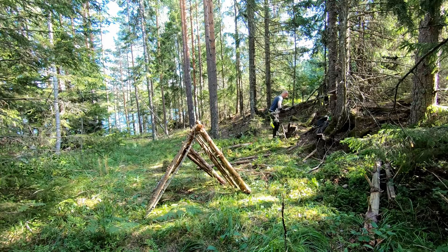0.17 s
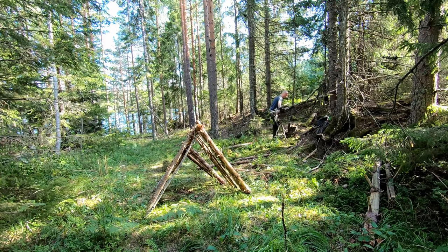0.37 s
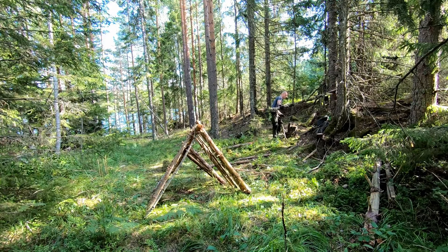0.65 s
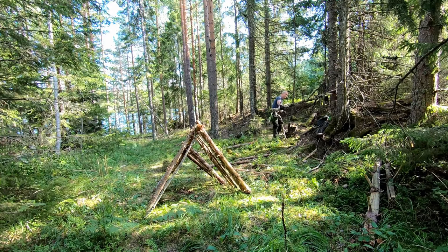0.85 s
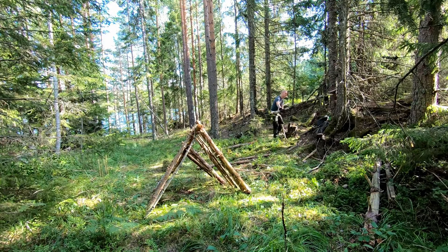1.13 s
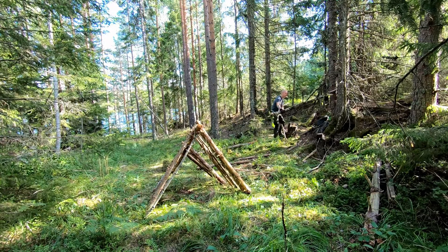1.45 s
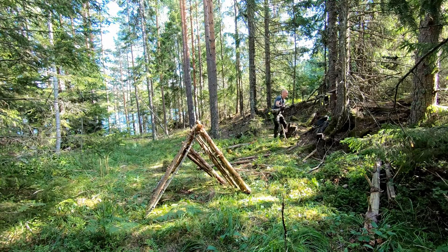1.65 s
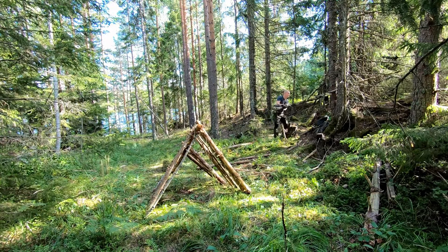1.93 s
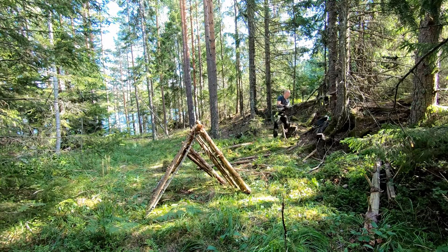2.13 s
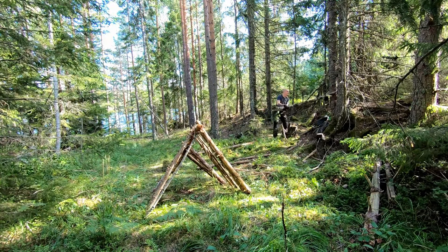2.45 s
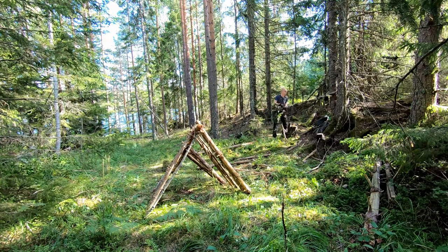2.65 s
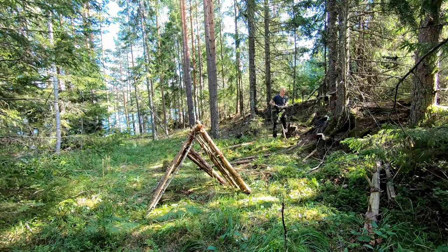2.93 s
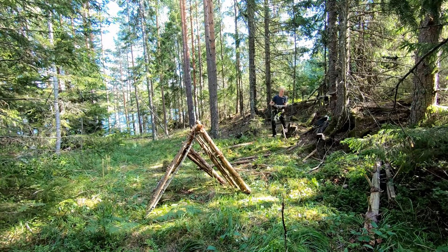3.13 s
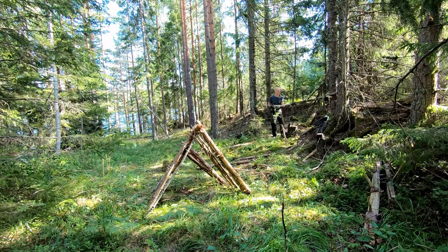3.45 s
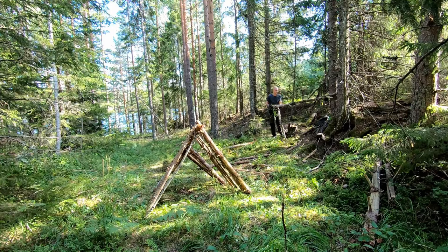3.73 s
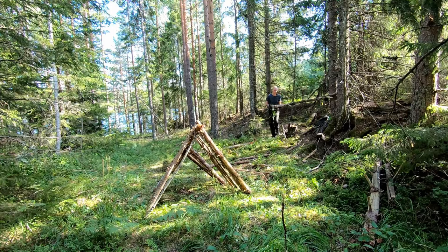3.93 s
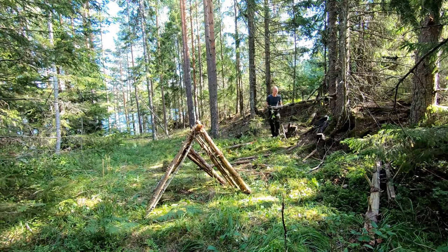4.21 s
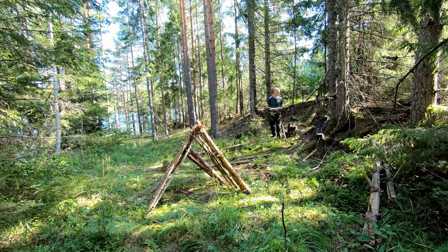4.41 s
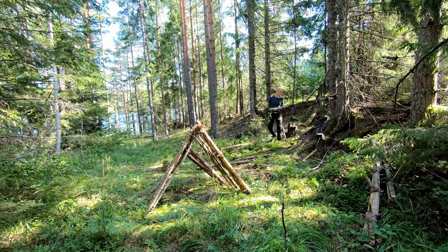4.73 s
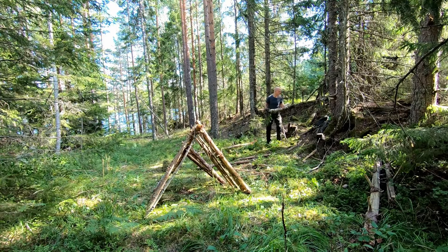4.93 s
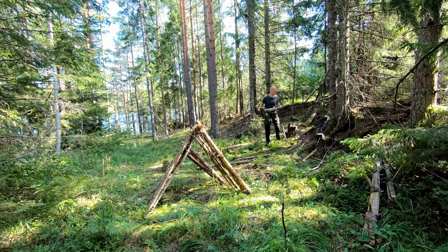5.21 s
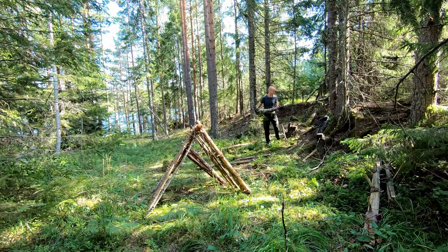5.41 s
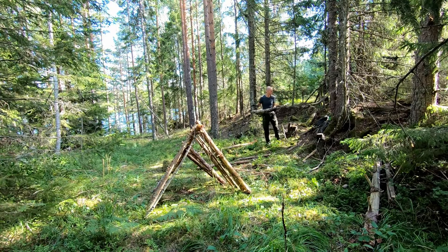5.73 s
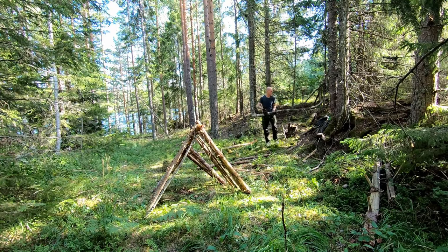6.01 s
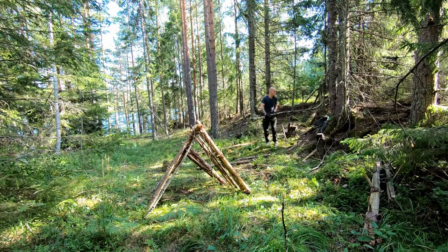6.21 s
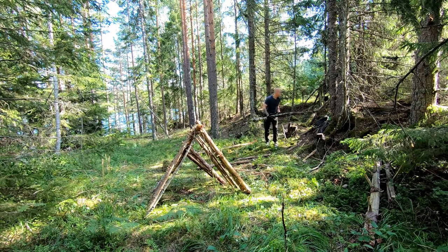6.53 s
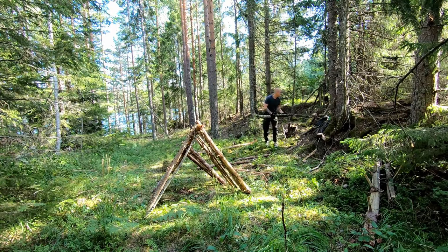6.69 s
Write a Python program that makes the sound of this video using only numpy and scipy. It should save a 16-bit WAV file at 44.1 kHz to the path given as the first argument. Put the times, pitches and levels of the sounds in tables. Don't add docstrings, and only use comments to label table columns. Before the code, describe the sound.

Quiet forest with a soft airy hush. A small bird buzzes nearby, then a dead branch snaps some way off, and a thicker one splinters in a louder run of cracks. Another stick cracks to the left, a far bird trills thinly, carried sticks clack dully amid rustling needles, and a bunch of thin twigs crunches at the end. Close stereo camera microphones catch a short woody echo from the trunks.

```python
import sys
import numpy as np
from scipy import signal
from scipy.fft import rfft, irfft, next_fast_len
from scipy.io import wavfile
from scipy.ndimage import uniform_filter1d

SR = 44100
rng = np.random.default_rng(int(sys.argv[2]) if len(sys.argv) > 2 else 0)


def decibels_to_gain(level_db):
    exponent = np.asarray(level_db, float) / 20
    return 10 ** exponent


def unload_wav(signal):
    wavfile.write(
        sys.argv[1],
        SR,
        np.round(np.clip(np.atleast_2d(signal).T, -1, 1) * 32767).astype(np.int16),
    )


N = 302349

# f/Hz, left minus right level/dB, left lead/rad
PORTS_AHEAD = [(100, 0, 0), (300, -2.5, -.25), (700, -6, .1), (1100, -6.5, .45), (2000, -4, .55),
               (3000, -2, .25), (4500, .5, .2), (6000, 1.5, -1.1), (8000, 3.5, -2.1), (9200, -1, -2.3),
               (10200, 4, -2.3), (13000, 1, -1.9)]


def evened(x):
    return x / np.sqrt(np.mean(abs(x) ** 2) + 1e-20)


def peaked(x, size):
    return x / np.sqrt(uniform_filter1d(x ** 2, size=size).max())


def read(points, hz, axis=1):
    table = np.transpose(points)
    return np.interp(np.log(hz + 1), np.log(table[0] + 1), table[axis])


def add(mix, s, sound):
    part = mix[round(s * SR):][:len(sound)]
    part += sound[:len(part)]


def band(x, lo_hz, hi_hz):
    return signal.sosfilt(signal.butter(2, [lo_hz, hi_hz], "bandpass", fs=SR, output="sos"), x)


def ports(left, ports_table, same=None, other=None):
    size = next_fast_len(N)
    hz = np.fft.rfftfreq(size, 1 / SR)
    a = b = rfft(left, size)
    if same:
        like = np.clip(read(same, hz), 0, 1)
        b = like * a + np.sqrt(1 - like ** 2) * rfft(other, size)
    gap = decibels_to_gain(read(ports_table, hz) / 2) * np.exp(.5j * read(ports_table, hz, axis=2))
    return irfft(np.array([a * gap, b / gap]), size)[:, :N]


def coloured(x, points):
    hz = abs(np.fft.fftfreq(4096, 1 / SR))
    log_gain = np.log(decibels_to_gain(np.maximum(read(points, hz), -100)))
    taps = np.fft.ifft(np.exp(np.conj(signal.hilbert(log_gain)))).real[:2048]
    return signal.oaconvolve(x, taps.reshape((1,) * (x.ndim - 1) + (-1,)), axes=-1)[..., :N]


def hush():
    # f/Hz, level/dB per Hz
    air_colour = [(15, -37), (25, 5.5), (92, -34), (153, -6), (394, -6), (463, -2), (531, -6.5), (734, 0.5),
                  (911, -4), (1160, -3.5), (3160, -9), (5140, -18.5), (7920, -15), (9320, -36),
                  (16000, -77.5)]
    # f/Hz, likeness/1
    air_same = [(60, -0.24), (150, 0.45), (380, 0.33), (950, 0.092), (2380, 0.64), (5980, 0.73),
                (15000, -0.16)]
    frames, hz = N // 256 + 5, np.fft.rfftfreq(1024, 1 / SR)
    re, im, patches = rng.standard_normal((3, frames, 513, 2)).transpose(0, 3, 2, 1)
    patches = uniform_filter1d(patches[0], size=12, axis=0)
    patches = evened(uniform_filter1d(patches, size=14, axis=1))
    z = (re + 1j * im) * decibels_to_gain(read(air_colour, hz)[:, None] + 1.4 * patches)
    air = signal.istft(z, nperseg=1024, noverlap=768)[1][:, :N]
    all_round = np.multiply(PORTS_AHEAD, [1, .4, 1])
    return decibels_to_gain(-60) * evened(ports(air[0], all_round, air_same, air[1]))


def steps():
    # t/s, peak level/dB, left minus right level/dB
    footfalls = [(0.769, -61, -1.0), (1.879, -58, -3), (3.489, -74, 2.0), (4.109, -57, 12), (4.809, -59, 6),
                 (5.009, -68, 6.0), (5.589, -67, 7.0), (5.749, -64, -6.0), (6.128, -45.5, 2),
                 (6.619, -69, -3.0), (6.829, -63, 2)]
    out = np.zeros((2, N))
    t = np.arange(-2000, 3000) / SR
    for s, db, pan_db in footfalls:
        for side, port in zip((1, -1), out):
            push = np.cos(2 * np.pi * 35 * t + 0.54 * side) * np.exp(-(t / 0.019) ** 2)
            add(port, s - 2000 / SR, decibels_to_gain(db + side * pan_db / 2) * push)
    return out


def note(hz, db, taper):
    tone = np.sin(2 * np.pi * np.cumsum(hz) / SR)
    return decibels_to_gain(db) * np.sqrt(2) * tone * signal.windows.tukey(len(hz), min(taper, 1))


def far_bird():
    # t/s, length/s, centre f/Hz, level/dB
    trills = [
        (3.3, .05, 8000, -75),
        (3.412, .075, 8250, -73),
        (3.575, .09, 8050, -77),
        (3.72, .11, 8080, -75),
        (3.872, .165, 7970, -68),
        (4.072, .185, 7900, -68),
        (4.291, .19, 7870, -68),
        (4.527, .17, 7880, -68),
        (4.74, .07, 7950, -78),
    ]
    out = np.zeros(N)
    for s, length, hz, db in trills:
        swing = np.cos(2 * np.pi * 33.5 * np.arange(round(length * SR)) / SR)
        pitch = hz - 40 + 420 * swing + 135 * swing ** 2
        add(out, s, note(pitch, db, .2) * (1 - .45 * swing))
    return out


def near_bird():
    # t/s, length/s, start f/Hz, end f/Hz, level/dB
    whistles = [
        (.378, .062, 6880, 6800, -70),
        (.445, .04, 6750, 6600, -76),
        (1.538, .022, 5000, 5900, -70),
        (1.665, .03, 4900, 6000, -68),
        (2.965, .038, 7050, 5250, -61),
        (3.1, .022, 6100, 6900, -60),
        (3.144, .055, 6650, 4950, -63),
        (3.252, .068, 6450, 4950, -63),
        (3.385, .07, 5900, 4600, -64),
        (3.457, .022, 4950, 5550, -70),
    ]
    # t/s, length/s, held f/Hz, end f/Hz, level/dB
    buzzes = [
        (.036, .058, 4640, 5100, -58.5),
        (.141, .04, 4550, 4700, -64),
        (.222, .04, 4150, 3900, -63.5),
        (.3, .045, 3980, 3600, -63),
        (.415, .075, 4620, 3500, -62.5),
        (.565, .03, 4100, 4400, -68),
    ]
    warble_hz, knee, scoop = 500, .68, .76
    out = np.zeros(N)
    for buzzing, rows in enumerate((whistles, buzzes)):
        for s, length, hz, end, db in rows:
            u = np.linspace(0, 1, round(length * SR))
            if buzzing:
                knees, pitches = [0, .42, .75, 1], [scoop * hz, hz, hz, end]
            else:
                middle = hz + knee * (end - hz)
                knees, pitches = [0, .8, .8, 1], [hz, middle, middle, end]
            glide = uniform_filter1d(np.interp(u, knees, pitches), size=300, mode="nearest")
            waver = evened(uniform_filter1d(rng.standard_normal(len(u)), size=120))
            warble = buzzing * np.sin(2 * np.pi * warble_hz * length * u)
            pitch = glide + 420 * warble + (30 + 25 * buzzing) * waver
            sung = note(pitch, db, .3 + .3 * buzzing)
            add(out, s, sung * (1 + .3 * warble))
    return out


def crackle(per_s, spread_db, wash):
    clump = decibels_to_gain(3.6 * evened(uniform_filter1d(rng.standard_normal(N), size=500)))
    size = decibels_to_gain(spread_db * np.minimum(rng.exponential(1, (2, N)), 5)) * rng.choice([-1, 1], (2, N))
    clicks = evened(size * (rng.random((2, N)) < clump * per_s / SR))
    return clicks + wash * clump ** 0.48 * rng.standard_normal((2, N))


def brush():
    # loudest t/s, swell time/s, twig level/dB, needles over twigs level/dB
    rustles = [(0, 0.37, -58.5, -9.5), (.42, 0.26, -59.5, -9), (.66, 0.098, -46, -4),
               (.88, 0.3, -56.5, -3.5), (1.1, 1, -62, -9), (1.9, 0.18, -40, -2), (2.1, 0.38, -54, -5),
               (2.55, 0.19, -59, -5.5), (3.3, 0.26, -55.5, -11.5), (4.0, 0.24, -66, -1),
               (4.25, 0.18, -69, 5), (4.68, 0.36, -59, 0.5), (4.93, 0.13, -54.5, -2.5),
               (5.15, 0.14, -55, -8), (5.35, 0.24, -55, -5), (5.551, 0.24, -53.5, -5), (5.66, 0.2, -52, -7),
               (5.8, 0.2, -64.5, 6), (6.12, 0.25, -57.5, -1.5), (6.3, 0.2, -58.5, -1.5),
               (6.479, 0.16, -54, -3), (6.65, 0.091, -67.5, 20.5)]
    # f/Hz, likeness/1
    brush_same = [(300, .6), (1500, 0.58), (4000, 0.79), (5000, 0.27), (9000, 0.96), (12000, 0.1)]
    swell_db, swell_bend, still_db = 17, 1.95, -70.5
    s, swell_s, twig_db, needle_db = np.transpose(rustles)[:, :, None]
    t = np.arange(0, N, 64) / SR
    sweeps = decibels_to_gain(twig_db - swell_db * (abs(t - s) / swell_s) ** swell_bend)

    def level(x):
        return np.interp(np.arange(N) / SR, t, np.sqrt((x ** 2).sum(0) + decibels_to_gain(still_db) ** 2))

    twigs = evened(band(crackle(2500, 3.7, 0.83), 570, 3040)) * level(sweeps) * decibels_to_gain(-5.0)
    needle_level = level(sweeps * decibels_to_gain(needle_db))
    needles = evened(band(crackle(3500, 1.6, 0.61), 2800, 18000)) * needle_level * decibels_to_gain(-1.0)
    mix = twigs + needles
    return ports(mix[0], PORTS_AHEAD, brush_same, mix[1])


def forest(x):
    # f/Hz, t60/s
    trunks = [(200, 0.33), (660, 0.21), (1740, 0.41), (4600, 0.33), (10000, 0.31)]
    # f/Hz, likeness/1
    tail_same = [(200, 0.94), (1000, 0.97), (2500, 0.45), (4000, 0.49), (7000, 0.24), (12000, 0.04)]
    far_t60_s, far_db, tail_db = 1.0, -21.5, -8
    size = 3 * SR // 2
    taps = np.zeros((2, size))
    slots = np.arange(150, size - 16, 16)
    at = slots + rng.integers(0, 16, (2, len(slots)))
    np.put_along_axis(taps, at, rng.standard_normal(at.shape), 1)
    hz, t, z = signal.stft(taps, SR, nperseg=128)
    fade = decibels_to_gain(-60 * t / read(trunks, hz)[:, None]) + decibels_to_gain(far_db - 60 * t / far_t60_s)
    fade = fade * (1 - np.exp(-t / .008))
    tail = signal.istft(z * fade, SR, nperseg=128)[1]
    wet = signal.oaconvolve(x[None], tail / np.linalg.norm(tail[0]), axes=1)[:, :N]
    return decibels_to_gain(tail_db) * ports(wet[0], PORTS_AHEAD, tail_same, wet[1])


def snap(row, hiss):
    brittle_at = [.632, .7268, .7536, 1.8455, 1.8706, 1.968, 2.0205, 2.147, 3.0268, 5.7601]
    faint_db, faint_span_db, drag = -37, 7.5, 0.88
    s, db, hz, knock_db, tick_db = row
    faint = np.clip((faint_db - db) / faint_span_db, 0, 1)
    t = np.arange(hiss.shape[1]) / SR / (1 + drag * faint)

    def burst(rise_s, t60_s, rest):
        return (1 - np.exp(-t / rise_s)) * (decibels_to_gain(-60 * t / t60_s) + rest * decibels_to_gain(-60 * t / (5.0 * t60_s)))

    click = 1. * (t == 0)
    brittle = 3.0 if np.abs(np.subtract(brittle_at, s)).min() < .001 else 1
    clean = brittle * np.interp(faint, (0, 1), (4.53, 5.2))
    layers = [(0, hz / 1.25, hz * 1.22, burst(.0004, .017, .07), 88),
              (-.8 + .4 * tick_db, 900 + .2 * hz, 4400, burst(.0003, .013, .09), 88),
              (tick_db + 5.0, 4600, 11500, burst(.00012, .006, .16), 66),
              (-5.0 + 0.46 * knock_db, 650, 1300, burst(0.000086, 0.025, 0.26), 130),
              (knock_db, 220, 600, burst(.003, .028, .05), 220)]
    sound, seed = np.zeros((2, len(t)))
    for noise, (rel_db, lo_hz, hi_hz, shape, size) in zip(hiss, layers):
        first = clean * np.roll(click, 10 + 40 * (hi_hz < 1000))
        part = decibels_to_gain(db + rel_db) * peaked(band(noise * shape + first, lo_hz, hi_hz), size)
        sound += part
        broad = evened(band(click, lo_hz / 1.62, min(hi_hz * 1.42, 18000)))
        seed += broad * np.sqrt(np.mean(part ** 2))
    return sound, seed


def breaks():
    # t/s, ring level/dB, ring f/Hz, knock rel. level/dB, tick rel. level/dB
    first_branch = [(0.5957, -49.5, 3280, -20, 1), (0.6097, -49, 3670, -16, 0),
                    (0.632, -32.5, 2260, -16.5, -1.5), (0.6415, -42, 2300, -30, -8),
                    (0.6492, -42, 3140, -20, -9), (0.6575, -48, 2600, -20, 2),
                    (0.662, -34, 2270, -6.5, -3.5), (0.7268, -42.5, 3300, -14, 6.5),
                    (0.7298, -41.5, 1800, -13, -8), (0.7372, -43, 2640, -8, -6),
                    (0.7536, -27.5, 2880, -7.5, 1), (0.76, -28.5, 3680, -12, 2.5),
                    (0.7672, -29, 1870, -15.5, -10), (0.769, -29.5, 1680, -6.5, -3),
                    (0.7722, -30.5, 1490, -26, -5), (0.7795, -41, 1900, -23.5, 3),
                    (0.7875, -38.5, 2590, -28, -9), (0.8005, -43, 1890, -22, -4),
                    (0.8203, -52, 2050, -25, -10)]
    # t/s, ring level/dB, ring f/Hz, knock rel. level/dB, tick rel. level/dB
    second_branch = [(1.754, -49, 1900, -8, 8), (1.7613, -26, 1920, -9.5, -4.5),
                     (1.7748, -37, 2450, -24, -7), (1.8003, -42, 1790, -22, 0),
                     (1.8095, -30, 1680, -3, 2.5), (1.8457, -32.5, 2270, -5, 3.5),
                     (1.8514, -36, 2450, -18, 4), (1.8531, -32, 2900, -5.5, -0.5),
                     (1.8556, -27.5, 1930, -1, -20), (1.864, -31.5, 2490, -29, -13),
                     (1.8707, -21.5, 3050, -11, -7.5), (1.8717, -19.5, 1490, -6, -3),
                     (1.8813, -32, 2780, -25, -4), (1.8854, -30, 3250, -37, -4),
                     (1.9076, -42, 1700, 0, -17), (1.9124, -29, 3170, -11, -0.5),
                     (1.9186, -32, 1510, -20, -10), (1.925, -31, 2260, -27, -8),
                     (1.968, -28, 2160, -12.5, -7.5), (1.9731, -36.5, 1530, -4, -4),
                     (1.986, -48, 1470, -2, -10), (2.0209, -36.5, 2700, -18, 0),
                     (2.051, -37.5, 2500, -8, -8), (2.092, -42, 1580, -24, -24),
                     (2.146, -45, 1820, -26, -2), (2.1514, -48.5, 2500, -15, -11),
                     (2.1639, -47.5, 1630, -20, -8)]
    # t/s, ring level/dB, ring f/Hz, knock rel. level/dB, tick rel. level/dB
    stick = [
        (3.0036, -53, 1580, -2, -29),
        (3.027, -28.5, 1670, -22, 5),
        (3.0272, -31.5, 3930, -27, -23),
        (3.0284, -33.5, 1620, -15, -10),
        (3.036, -46, 3600, -21, -17),
    ]
    # t/s, ring level/dB, ring f/Hz, tick rel. level/dB
    clacks = [(3.9796, -48, 1580, -20), (3.99, -54, 1680, -15), (5.185, -55, 2620, -15),
              (5.1888, -50, 1950, -23), (5.1995, -47.5, 1700, -26), (5.2076, -48.5, 1070, -23),
              (5.2806, -60, 1740, -26), (5.3545, -56, 1820, -15), (5.4463, -44, 1520, -18),
              (5.454, -49.5, 1340, -8), (5.5238, -46, 1830, -31), (5.5334, -45, 2120, -30),
              (5.5486, -49.5, 2300, -29), (5.569, -41.5, 1460, -32), (5.587, -56, 2000, 5.5),
              (5.6037, -48, 1580, -1), (5.6381, -45.5, 1520, -13), (5.675, -48, 1290, -26),
              (5.6844, -50, 1600, -14), (5.7007, -47.5, 1410, -22), (5.7596, -42, 1560, -8),
              (5.78, -39.5, 1390, -37), (5.8538, -41.5, 1450, -46), (6.148, -50, 1520, -1),
              (6.193, -52, 1490, -22), (6.201, -60, 1560, -24)]
    # t/s, ring level/dB, ring f/Hz, tick rel. level/dB
    bunch = [(6.592, -53, 1900, -5), (6.5963, -57, 2400, 11), (6.6055, -49.5, 2400, 10),
             (6.6138, -40, 1920, 6.5), (6.6156, -38, 3760, 4), (6.6177, -53, 2000, 9),
             (6.6305, -56, 3000, -9), (6.6326, -48, 3800, -7), (6.6517, -53, 3800, -8),
             (6.6778, -52, 1900, -8), (6.6715, -44.5, 2020, 3), (6.6887, -47, 1960, 1),
             (6.695, -40, 2290, 1), (6.705, -50.5, 2210, 9), (6.7875, -62, 3000, 16),
             (6.7957, -47.5, 2720, 7.5), (6.8, -52, 2640, 1), (6.814, -64, 3500, 9)]
    # t/s, ring level/dB, tick rel. level/dB
    tips = [(0.432, -60, -5), (1.0, -64, 6.5), (1.672, -60.5, 3), (2.3276, -64.5, 10.5), (2.4957, -70, 9),
            (2.535, -60.5, 0), (2.5958, -66, 0), (2.8085, -58, 5.5), (2.98, -61, -4), (3.3282, -72, 0),
            (3.3733, -69, -1), (3.939, -73, 14), (4.074, -65.5, 11), (4.244, -56.5, 5.5),
            (4.426, -56.5, -15), (4.625, -63.5, 14), (4.731, -64.5, 10), (4.889, -59.5, 8.5),
            (4.905, -57, -2), (4.9235, -60, -4), (5.476, -57.5, 3), (5.771, -52, 5.5), (6.1112, -59, -14),
            (6.123, -49.5, -3), (6.1538, -63, 0), (6.278, -64, 11.5), (6.292, -60.5, 4), (6.3528, -58.5, 4),
            (6.4121, -57, 2), (6.476, -53.5, -10)]
    clack_knock_db, bunch_knock_db, tip_knock_db = -17.5, -21.5, -9.5
    tip_hz = 1930 * np.exp(0.9 * rng.uniform(-1, 1, len(tips)))
    return (first_branch + second_branch + stick
            + [(s, db, hz, clack_knock_db, tick_db) for s, db, hz, tick_db in clacks]
            + [(s, db, hz, bunch_knock_db, tick_db) for s, db, hz, tick_db in bunch]
            + [(s, db, hz, tip_knock_db, tick_db) for (s, db, tick_db), hz in zip(tips, tip_hz)])


def snaps():
    lag_s = .0003
    ahead, aside, seeds = np.zeros((3, N))
    for row in breaks():
        sound, seed = snap(row, rng.standard_normal((5, 2500)))
        is_aside = 3.02 < row[0] < 3.03
        add(aside if is_aside else ahead, row[0] + lag_s, sound)
        if is_aside:
            seed = seed + 0.079 * seed + 1.25 * band(seed, 2400, 7400)
        add(seeds, row[0], seed)
    return ahead, aside, seeds


def scene():
    # f/Hz, left minus right level/dB, left lead/rad
    ports_aside = [(100, 0, .1), (600, 1, .2), (1600, 1, .5), (2300, 3.5, 1.2), (3000, 7, .5),
                   (3800, 5, -.4), (4800, 2, .1), (6800, 1.5, .75), (8000, -.7, .5), (9200, -1, 1.4),
                   (11000, 3, 2.1), (13500, -3, 2.0)]
    # f/Hz, level/dB
    case = [(120, -8), (250, -3.5), (3800, 4), (4900, -4), (6000, 3.5), (8200, 4.5), (9200, -1),
            (11000, -11), (13500, -23), (15600, -20), (16600, -81)]
    ahead, aside, seeds = snaps()
    flutter = evened(uniform_filter1d(rng.standard_normal(N), size=250))
    chirps = near_bird() * decibels_to_gain(2.6 * flutter - 1)
    trill = far_bird() * decibels_to_gain(3.0 * flutter + 1.5)
    near = ports(ahead + chirps + trill, PORTS_AHEAD) + ports(band(aside, 150, 7300), ports_aside)
    wet = forest(seeds + 1.2 * chirps + 1.1 * trill)
    return coloured(near + wet + brush(), case) + hush() + steps()


def roll_off(x):
    return signal.sosfilt(signal.butter(12, 16480, fs=SR, output="sos"), x)


def record(dry):
    return roll_off(dry)


dry = scene()
out = record(dry)
unload_wav(out)
```